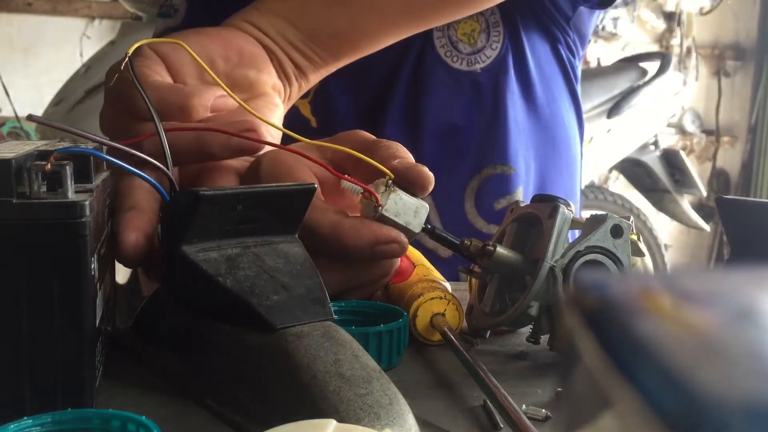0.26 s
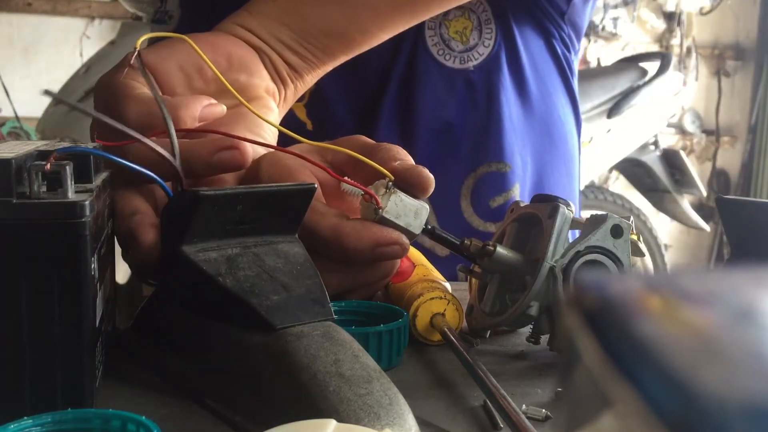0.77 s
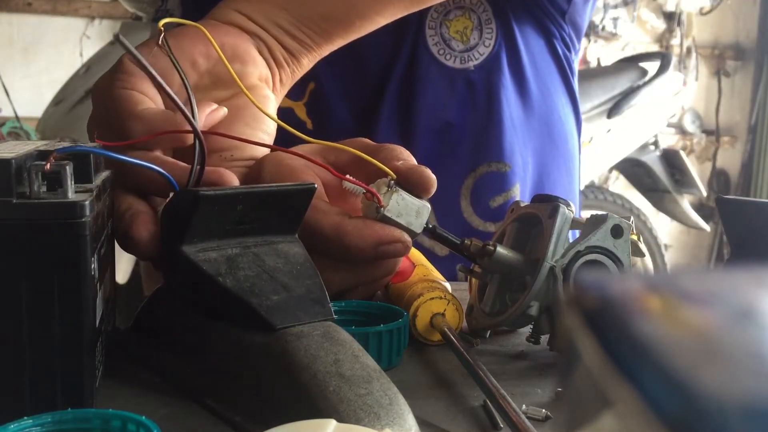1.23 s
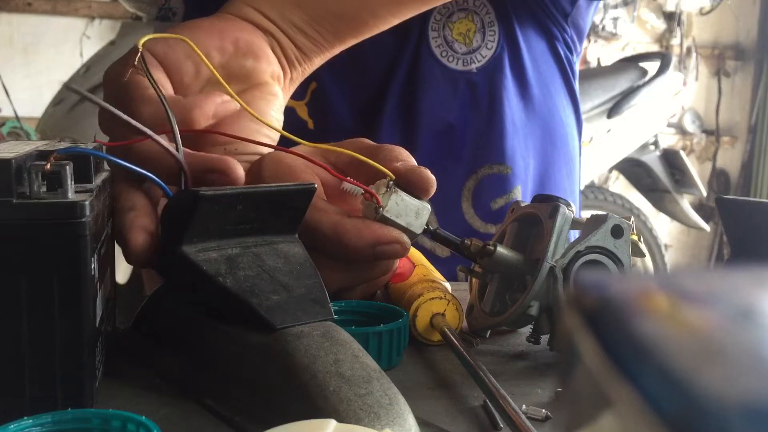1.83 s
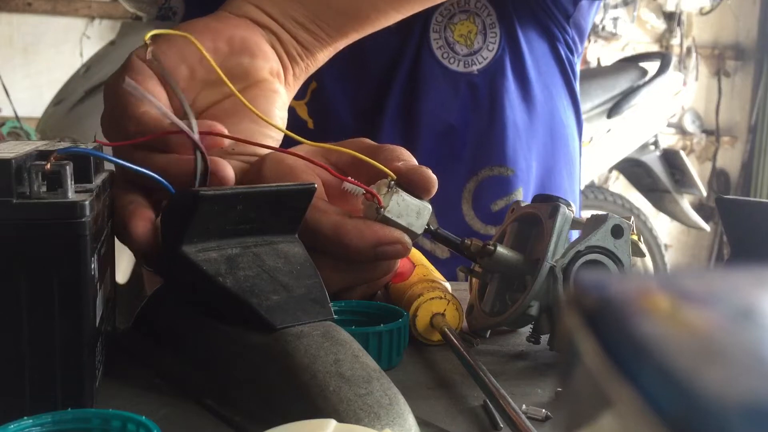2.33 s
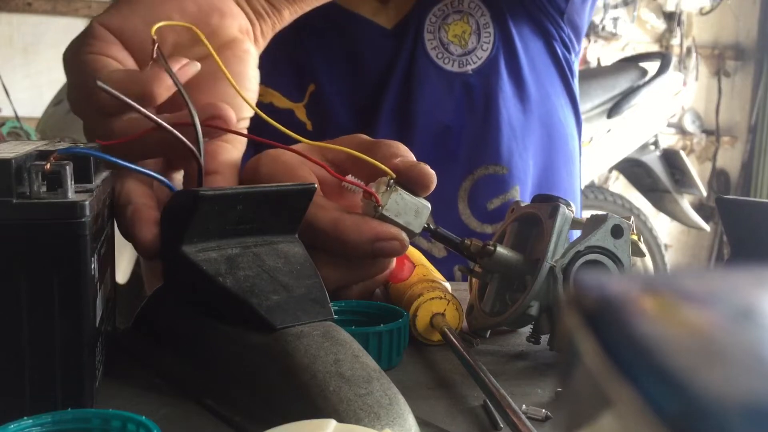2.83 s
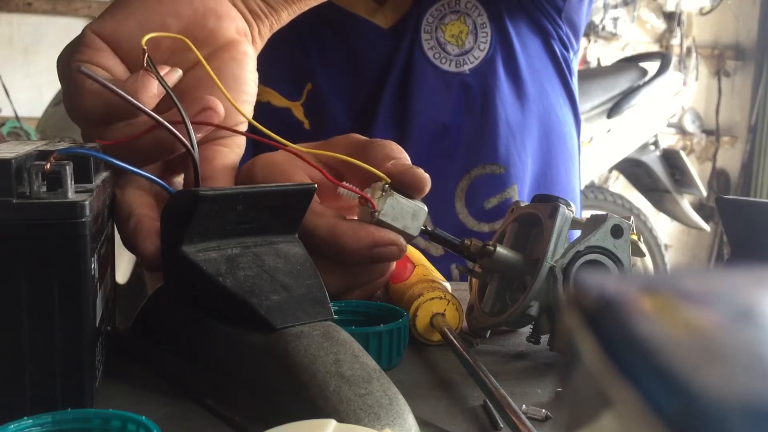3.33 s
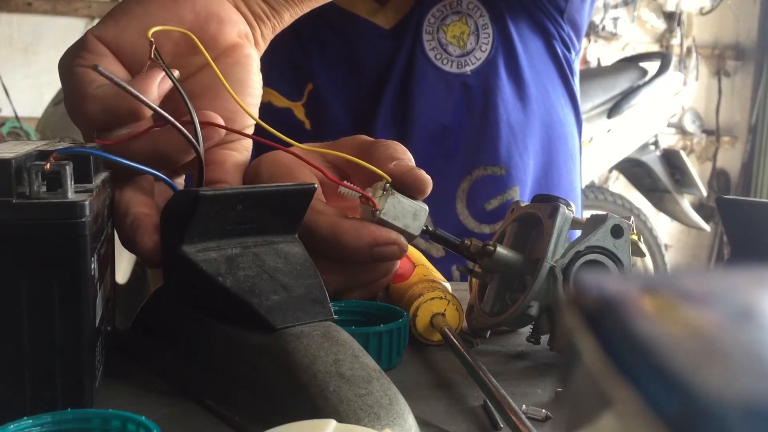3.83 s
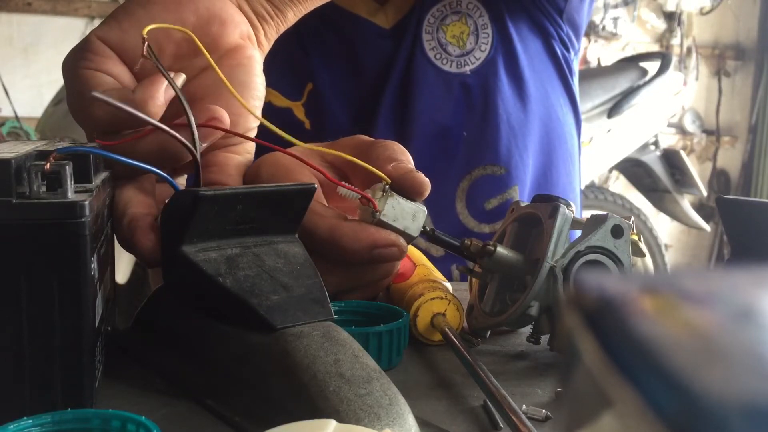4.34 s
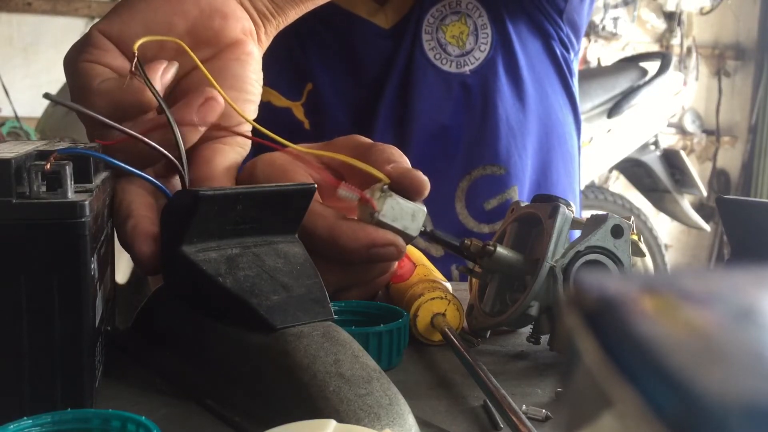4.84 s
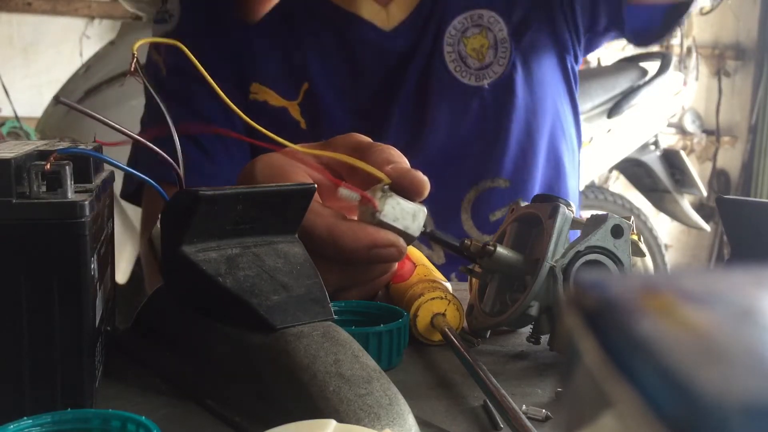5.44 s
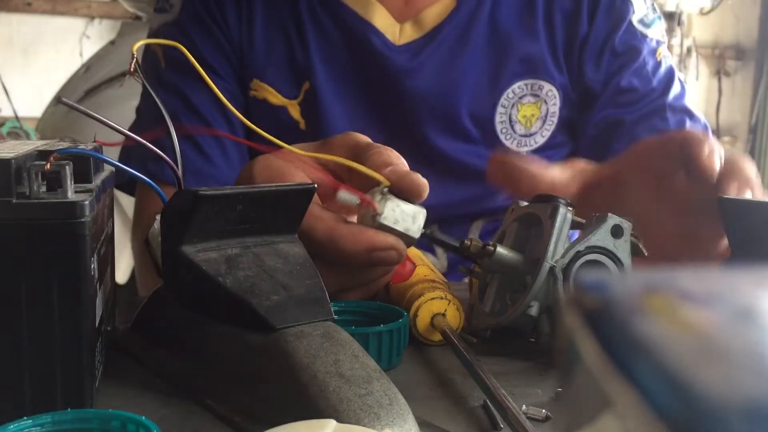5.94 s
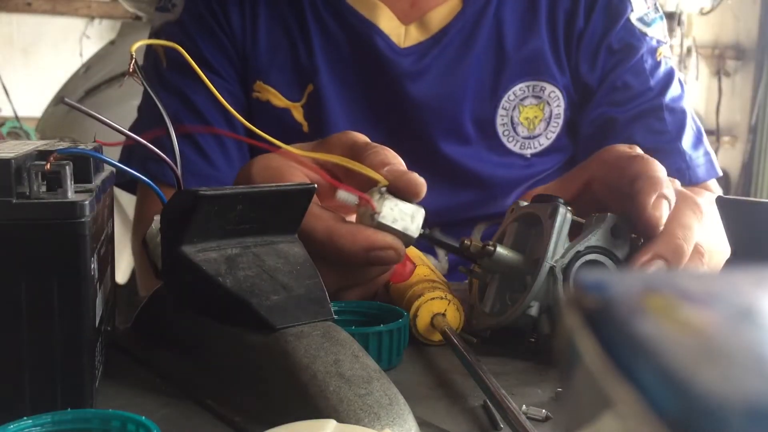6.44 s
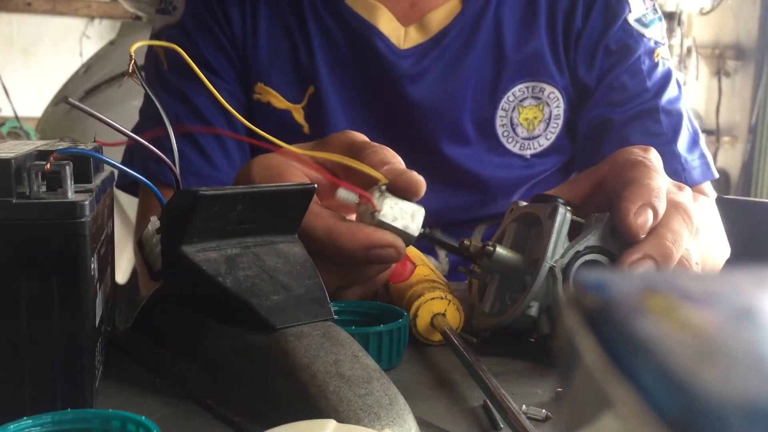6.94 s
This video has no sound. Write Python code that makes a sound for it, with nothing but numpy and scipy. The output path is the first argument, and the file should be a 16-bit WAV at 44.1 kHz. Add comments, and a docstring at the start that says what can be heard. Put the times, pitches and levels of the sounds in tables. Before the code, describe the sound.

A small motor hums deep and steady on a workbench, growing louder and creeping up in pitch over a low workshop rumble. Three crisp, dry ticks snap close to the microphone. A faint high whine climbs, hiss builds, and the mount sings briefly. In the last few seconds a loose part chatters in fast, gritty, metallic bursts while the hum continues.

```python
"""A small motor hums on a workbench and speeds up a little: sines at multiples of the turning rate.
Around it lie a rumbling workshop wash, a growing hiss and soft scuffs, all of shaped noise; a fuzzy
whistle makes the thin whine, and noise resonances make the mount sing. Three sharp ticks snap close by
as decaying rings with echoes. Late on, trains of knocks ring a loose part and it chatters."""
import sys
import numpy as np
from scipy import signal
from scipy.io import wavfile
from scipy.ndimage import uniform_filter1d

SR = 44100
rng = np.random.default_rng(int(sys.argv[2]) if len(sys.argv) > 2 else 0)


def put_to_file(sound):
    """Save the sound as 16-bit audio at rate SR, in the file named by the first command-line argument."""
    columns = np.atleast_2d(sound).T  # one column per channel
    safe = np.clip(columns, -1, 1)
    whole_steps = np.round(safe * 32767)
    wavfile.write(sys.argv[1], SR, whole_steps.astype(np.int16))


N = 316877
T = np.arange(N) / SR  # seconds

# The motor shaft. Each row: time in seconds, turns per second in Hz, first order in dB, second order in dB.
SHAFT = [(0, 51.5, -73, -53), (.4, 51.7, -36, -38), (.94, 52.91, -33, -35.5), (1.6, 53.49, -34.5, -38),
         (1.9, 55.27, -32, -57), (2.28, 55.83, -25.5, -57), (2.7, 55.8, -22.5, -42),
         (3.3, 56.3, -22, -37.5), (3.8, 57.48, -18, -35), (4.4, 57.3, -19.5, -32.5),
         (5.0, 57.38, -18.5, -27.5), (5.42, 58.77, -19.5, -33.5), (5.84, 57.86, -19, -30),
         (6.36, 60.5, -22.5, -27), (6.7, 59.8, -21.5, -31.5), (7.19, 60.04, -27, -35.5)]
LOOSE_S = 4.5  # the part works loose


def gain_of(db):
    """Decibels to gain."""
    return 10 ** (np.asarray(db) / 20)


def evened(x):
    """Scales to rms 1."""
    return x / np.sqrt(np.mean(x ** 2) + 1e-20)


def columns(rows):
    """Each column of a curve over time, sample by sample."""
    s, *values = np.transpose(rows)
    return [np.interp(T, s, v) for v in values]


def between(start, stop, fade):
    """A gate with straight fades, half open at start and at stop."""
    opening = np.clip((T - start) / fade + .5, 0, 1)
    closing = np.clip((stop - T) / fade + .5, 0, 1)
    return opening * closing


def drift(seconds, count=N):
    """Slow chance of rms 1: noise averaged twice over the given span."""
    size = max(int(seconds * SR), 2)
    once = uniform_filter1d(rng.standard_normal(count), size)
    return evened(uniform_filter1d(once, size))


def resonate(x, hz, width):
    """A resonance of gain about 1: one pair of poles, width in Hz."""
    r = np.exp(-np.pi * width / SR)
    c = r * np.cos(2 * np.pi * hz / SR)
    return signal.lfilter([2 * (1 - r), -2 * (1 - r) * c], [1, -2 * c, r * r], x)


def fuzzy(hz, width):
    """A steep band of noise, rms 1: two equal resonances in a row."""
    once = resonate(rng.standard_normal(N), hz, width)
    return evened(resonate(once, hz, width))


def noise(spectrum, patchy_db, streaky_db, size):
    """Random short-time spectra with drifting patches and narrow lasting streaks, rms 1."""
    hz = np.fft.rfftfreq(size, 1 / SR)
    f, db = np.transpose(spectrum)
    frames = N // (size // 4) + 5
    a, b, patches, streaks = rng.standard_normal((frames, len(hz), 4), dtype=np.float32).T
    # axis 0 is frequency, axis 1 is time
    patches = evened(uniform_filter1d(uniform_filter1d(patches, size=10, axis=0), size=16, axis=1))
    streaks = uniform_filter1d(streaks, size=2, axis=0)
    streaks = evened(uniform_filter1d(streaks, size=SR * 2 // size, axis=1))
    shape_db = np.interp(np.log(hz + 1), np.log(f + 1), db, left=-120, right=-120)[:, None]
    z = (a + 1j * b) * gain_of(shape_db + patchy_db * patches + streaky_db * streaks)
    return evened(signal.istft(z, nperseg=size, noverlap=size * 3 // 4)[1][:N])


def hum():
    """The turning shaft gives clean sines at its first three orders, and later a faint fifth."""
    # Level of the third order. Each row: time in seconds, level in dB.
    third_level = [(0, -40), (3.0, -39.5), (3.6, -35.5), (4.1, -36), (4.6, -42.5), (5.1, -33.5), (5.5, -43),
                   (6.0, -39.5), (6.8, -35), (7.19, -59)]
    lead, wander = 1.3, .25  # radians that each order leads the one below, and how far it wanders
    hz, *levels_db = columns(SHAFT)
    turns = np.cumsum(hz) / SR
    levels_db.append(columns(third_level)[0])
    out = gain_of(-51.5) * between(3.5, T[-1] + 1, .4) * np.cos(2 * np.pi * 5 * turns)
    for k, db in enumerate(levels_db):
        phase = k * (lead + wander * drift(0.28))
        out += gain_of(db) * np.cos(2 * np.pi * (k + 1) * turns + phase)
    return np.sqrt(2) * out  # the levels are rms


def wash():
    """The workshop's low rumble and mid body are shaped noise, with narrow wavering drones."""
    # Colour of the rumble. Each row: frequency in Hz, relative density in dB per Hz.
    rumble_colour = [(25, -47), (38, -17), (50, 5.5), (64, -0.5), (75, -9.5), (107, 0), (166, 1), (195, -6),
                     (250, -7.5), (307, -15), (370, -13.5), (420, -29), (520, -30)]
    # Colour of the mid body. Each row: frequency in Hz, relative density in dB per Hz.
    body_colour = [(300, -23), (370, -26), (410, -6), (470, -3.5), (600, -3), (750, -5), (1000, -4.5),
                   (1650, -5), (1900, -9), (2300, -9.5), (2750, -22), (3500, -23.5), (4500, -38)]
    # Level of the mid body. Each row: time in seconds, level in dB.
    body_level = [(0, -50), (.7, -45), (3.2, -43.5), (4.6, -41.5), (5.3, -39.5), (5.6, -41.5), (6.3, -42.5),
                  (7.19, -43.5)]
    # Drones that come and go. Each row: frequency in Hz, resonance width in Hz, level in dB,
    # start in seconds, end in seconds.
    drones = [(235, 9, -43, 0, 1.15), (157, 10, -38, .4, 5.6), (135, 7, -41, 1.4, 4.6),
              (98, 7, -42, 5.8, 7.3), (250, 7, -47, 4.0, 5.4), (210, 10, -45, 4.5, 7.3),
              (478, 30, -56, 4.3, 7.3), (1345, 45, -58, .8, 3.9), (995, 25, -54, 3.87, 4.36),
              (155, 8, -39, 6.4, 7.1), (1320, 50, -52, 5.3, 5.65)]
    rumble_db = -33.5 + .5 * T + 0.5 * drift(0.19)  # grows slowly and wavers
    rumble_db -= np.exp(-T / 0.15)  # a little quieter at first
    out = gain_of(rumble_db) * noise(rumble_colour, patchy_db=0.27, streaky_db=1.5, size=4096)
    out += gain_of(columns(body_level)[0]) * noise(body_colour, patchy_db=1.3, streaky_db=2.5, size=2048)
    for hz, width, db, start, stop in drones:
        out += gain_of(db) * between(start, stop, 0.12) * fuzzy(hz, width)
    return out


def hiss():
    """A dull and a bright noise flicker, with bands that they ring in the casing."""
    # Level of the dull hiss before the flicker. Each row: time in seconds, level in dB.
    dull_level = [(0, -68), (.9, -61.5), (2.5, -63), (3.3, -57.5), (3.85, -52), (4.05, -55.5), (4.5, -50),
                  (5.1, -47), (6.1, -54.5), (7.19, -56.5)]
    # Colour of the dull hiss. Each row: frequency in Hz, relative density in dB per Hz.
    dull_colour = [(2200, 2.5), (2800, -3), (3600, -6.5), (4100, -4), (5000, -7), (6300, -7.5),
                   (7200, -13.5), (9000, -13.5), (11000, -23), (15700, -47)]
    # Colour of the bright hiss. Each row: frequency in Hz, relative density in dB per Hz.
    bright_colour = [(3000, -26), (5000, -5.5), (7000, 0.5), (9500, 2), (10600, 0.5), (11700, 3),
                     (13000, -1), (14500, -0.5), (15650, 2), (15800, -43)]
    # Swells of the bright hiss. Each row: start in seconds, end in seconds, level at the start in dB,
    # sag in dB per second.
    swells = [(3.505, 3.98, -60.5, -1), (4.52, 5.899, -49.5, 2.5), (6.327, 7.093, -50.5, 8)]
    # Rings of the casing. Each row: frequency in Hz, resonance width in Hz, level in dB,
    # start in seconds, end in seconds.
    casing = [(4100, 400, -69, 0, 4.4), (8100, 800, -70, 1.9, 4.5), (8100, 700, -70, 2.5, 3.3),
              (6350, 300, -70, 3.1, 3.4), (11600, 900, -63, 4.5, 7.3), (14600, 600, -68, 4.5, 7.3)]
    floor_db, top_db, creep_s, creep_db_per_s = -79, -56, 1.96, 8
    # the bright hiss creeps up steadily, then holds its level
    bright = gain_of(np.clip(floor_db + creep_db_per_s * (T - creep_s), floor_db, top_db))
    for start, stop, db, sag_db in swells:
        swell = gain_of(db - sag_db * (T - start)) * between(start, stop, 0.33)
        bright = np.hypot(bright, swell)
    air = gain_of(columns(dull_level)[0]) * noise(dull_colour, patchy_db=.4, streaky_db=1.2, size=1024)
    air += bright * noise(bright_colour, patchy_db=2.2, streaky_db=3.0, size=1024)
    for hz, width, db, start, stop in casing:
        air += gain_of(db + 1.8 * drift(0.045)) * between(start, stop, 0.17) * fuzzy(hz, width)
    return air * gain_of(1.2 * drift(0.044))


def throb():
    """A gain that swells once per shaft turn until the part works loose."""
    depth = .18 * between(-1, LOOSE_S, .2)
    return 1 + depth * np.cos(2 * np.pi * np.cumsum(columns(SHAFT)[0]) / SR)


def scuffs():
    """Soft scuffs on the bench are short puffs of wide noise."""
    # Each row: start in seconds, level in dB, length in seconds, centre in Hz, resonance width in Hz.
    puffs = [(.24, -75, 0.051, 12500, 2500), (1.345, -56.5, 0.06, 3200, 3500),
             (1.88, -58, 0.031, 3200, 2800), (4.981, -47.5, 0.12, 3300, 2017)]
    out = np.zeros(N)
    for s, db, length, hz, width in puffs:
        out += gain_of(db) * between(s, s + length, length / 2) * fuzzy(hz, width)
    return out


def whine():
    """A fuzzy whistle with a finer core climbs evenly, then settles: slow noise shifted up to its pitch."""
    # Level before the flutter. Each row: time in seconds, level in dB.
    whine_level = [(.8, -75), (1.3, -64.5), (2.0, -77), (3.0, -74), (3.25, -67.5), (3.7, -59.5),
                   (3.95, -66), (4.15, -71), (4.45, -62), (4.7, -81)]
    start_hz, climb_hz_per_s, top_hz, bend_s = 6800, 1030, 9930, 0.55
    hz = uniform_filter1d(np.minimum(start_hz + climb_hz_per_s * T, top_hz), int(bend_s * SR))
    carrier = np.exp(2j * np.pi * np.cumsum(hz) / SR)
    wide, fine = (drift(s) + 1j * drift(s) for s in (.0015, .007))
    whistle = evened(((wide + 0.51 * fine) * carrier).real)
    level = gain_of(columns(whine_level)[0] + 1.8 * drift(0.023))
    return level * between(whine_level[0][0], whine_level[-1][0], 0.11) * whistle


def ticks():
    """A short crack rings the contact; echoes and a quick diffuse tail follow."""
    # Each row: time in seconds, then the strength in dB with which each ring of the contact is struck.
    snaps = [(1.547, -25, -18.5, -23, -3, -22, -9.5, -11, -32, -13, -11, -27, -12.5, -27, -19),
             (2.4803, -27, -16, -16, -11, -11.5, -11.5, -6.5, -11.5, -9, -23, -17, -13, -7.5, -7),
             (4.3598, -27, -19.5, -40, -9.5, -12, -10, -4, -17, -18, -13, -6.5, -9.5, -17, -13)]
    # Rings of the snapped contact. Each row: frequency in Hz, 60 dB decay time in seconds.
    contact = [(1450, 0.0086), (2300, 0.0055), (3050, 0.0072), (4240, 0.0087), (4680, 0.013),
               (5800, 0.0072), (6590, 0.0053), (8300, 0.0087), (9000, 0.0048), (10000, 0.0077),
               (10850, 0.0078), (11350, 0.0085), (12200, 0.0067), (14100, 0.0041)]
    # Nearby surfaces return each snap. Each row: delay in seconds, level in dB.
    returns = [(.0058, -19), (.0105, -24)]
    out, t = np.zeros(N), np.arange(round(.15 * SR)) / SR
    rise = 1 - np.exp(-(t / 0.00042) ** 2)
    rise = gain_of(-2.0) * rise * (1 + 1.1 * np.exp(-t / .0009))  # the first instant is stronger
    # a quick and a slow decay, by 60 dB in 0.036 s and 0.19 s
    tail = gain_of(-22.5 - 60 * t / 0.036) + gain_of(-39.0 - 60 * t / 0.19)
    tail *= 1 - np.exp(-t / 0.0005)
    for s, *strengths_db in snaps:
        sound = np.zeros(len(t))
        for db, (hz, t60) in zip(strengths_db, contact):
            # each ring starts at a chance phase within half a cycle
            phase = 2 * np.pi * (hz * (t - .0004) + .5 * rng.random())
            ring = rise * gain_of(-60 * t / t60) * np.sin(phase)
            diffuse = evened(resonate(rng.standard_normal(len(t)), hz, 660))
            sound += gain_of(db) * (ring + tail * diffuse)
        # a faint touch 1 ms early, the snap itself, then its echoes
        for delay, db in [(-0.001, -21), (0, 0), *returns]:
            stretch = out[round((s + delay) * SR):][:len(t)]
            stretch += gain_of(db) * sound
    return out


def mount():
    """The motor strains and its mount sings: the same fuzzy resonances each time."""
    # Strains. Each row: start in seconds, end in seconds, level in dB, pitch factor.
    strains = [(3.306, 4.004, -51.5, 1.0), (4.85, 5.41, -51, 1.03)]
    # What sings. Each row: frequency in Hz before the pitch factor, resonance width in Hz, relative level in dB.
    resonances = [(972, 27, -2.5), (1307, 51, -6), (1669, 99, 2.5), (6260, 280, -10.5), (7800, 410, -9),
                  (8300, 310, -10)]
    out = np.zeros(N)
    for start, stop, db, factor in strains:
        for hz, width, ring_db in resonances:
            level = gain_of(db + ring_db + 1.44 * drift(0.021))
            out += level * between(start, stop, 0.27) * fuzzy(hz * factor, width)
    return out


def chatter(air):
    """Regular gritty knocks ring a loose part, each ring fickle by itself, and the hiss beats along."""
    # Bouts of louder chatter, most of them faster. Each row: start in seconds, end in seconds,
    # knocks per second in Hz, rebound from 0 to 1, then low, middle and high rings in dB.
    bout_rows = [(4.5, 4.623, 77.7, 0.4, -48.5, -54, -61), (4.698, 5.104, 78.2, 0.6, -64, -54, -68),
                 (5.182, 5.375, 82, 0.3, -53.5, -53, -57), (5.425, 5.713, 83.6, 0.06, -51, -56, -57),
                 (5.74, 5.952, 80.2, 0.6, -59, -66, -59), (6.178, 6.267, 81.98, 0.79, -58, -70, -61),
                 (6.302, 6.463, 89.7, .4, -62, -53, -54.5), (6.459, 6.66, 89.2, 0.9, -50.5, -53, -54),
                 (6.681, 6.924, 89.4, 0.45, -50, -57, -58), (6.924, 7.117, 90, .4, -52.5, -59.5, -58)]
    # Three groups of rings: low, middle, high. Each row: frequency in Hz, width of the first of
    # two resonances in Hz, relative level in dB.
    ring_groups = [
        [(4410, 110, 0), (4580, 120, -7), (4230, 200, -17)],
        [(5200, 400, -6), (5900, 250, -4), (6560, 150, -1), (7200, 170, -6), (7840, 140, -3), (8720, 120, 0),
         (9320, 140, -3), (9790, 110, -6)],
        [(10900, 250, -5), (11700, 300, 0), (13300, 160, -7), (14500, 200, -3), (15300, 200, -2)],
    ]
    # One ring changes level for a while. Each row: start in seconds, end in seconds, ring in Hz, change in dB.
    flares = [(4.5, 4.64, 4230, 14), (4.5, 5.72, 4580, 6), (5.61, 5.69, 6560, 6), (6.7, 6.75, 6560, 8),
              (6.76, 6.95, 4580, 5), (6.75, 6.9, 4410, 2), (6.64, 6.75, 4410, -2), (6.5, 6.62, 7200, 5),
              (5.1, 5.2, 9320, 6), (5.27, 5.37, 6560, 6), (5.2, 5.42, 14500, 4), (5.62, 5.72, 11700, 5),
              (5.44, 5.55, 7200, 8), (5.45, 5.56, 7840, 6), (5.47, 5.54, 9320, 9), (6.36, 6.62, 5200, 5),
              (6.31, 6.46, 7840, 6), (6.43, 6.49, 6560, 7), (6.33, 6.46, 11700, 5), (6.37, 6.53, 14500, 5),
              (6.5, 6.64, 5900, 6), (6.54, 7.02, 8720, 6), (6.76, 7.0, 10900, 5)]
    loose_hz, loose_db = 77.7, (-61.5, -63.5, -59.5)  # between bouts: knocks per s; low, middle, high rings
    fade_s = 0.046
    first = round(LOOSE_S * SR)
    gates = np.array([between(start, stop, fade_s)[first:] for start, stop, *_ in bout_rows])
    bouts = np.array(bout_rows)
    hz = loose_hz + (bouts[:, 2] - loose_hz) @ gates
    count = len(hz)
    levels = np.sqrt(gain_of(loose_db)[:, None] ** 2 + gain_of(bouts[:, 4:].T) ** 2 @ gates)

    uneven_hz = hz * (1 + .006 * drift(.02, count=count))
    knocks = np.diff(np.floor(np.cumsum(uneven_hz) / SR), prepend=0)
    knocks *= gain_of(1.0 * rng.standard_normal(count))
    # the part swings back 24 cycles of its first low ring later, in step with it
    rebound = np.roll(knocks, round(24 / ring_groups[0][0][0] * SR))
    swing = np.clip(bouts[:, 3] @ gates, 0, 1)

    # a brief scrape follows each blow
    n = np.arange(400)
    scrape = n / (0.00083 * SR) * np.exp(-n / (0.0023 * SR))
    beat = abs(signal.oaconvolve(knocks, scrape)[:count])
    share = .4 * np.clip(gates.sum(axis=0), 0, 1)  # of the hiss power that beats during a bout
    out = air.copy()
    out[first:] *= np.sqrt(1 - share + share * beat / beat.mean())

    by_group = zip(ring_groups, levels, (1, .3, .3), (.035, .04, .1), (.6, 1.6, 1.8))
    for rings, level, back, grit, fickle_db in by_group:
        blows = knocks + back * swing * rebound
        scrapes = signal.oaconvolve(blows, scrape)[:count]
        blows = blows + grit * scrapes * rng.standard_normal(count)
        group = np.zeros(count)
        for f, width, ring_db in rings:
            db = ring_db + fickle_db * drift(.1, count=count)
            for start, stop, flare_hz, flare_db in flares:
                if flare_hz == f:
                    db += flare_db * between(start, stop, fade_s)[first:]
            ringing = resonate(resonate(blows, f, width), f, 3 * width)
            group += gain_of(db) * evened(ringing)
        out[first:] += level * evened(group)
    return out


def scene():
    """All sources at one microphone; mount, whine and hiss throb with the shaft."""
    steady = hum() + wash()
    air = chatter(throb() * hiss())
    singing = throb() * (mount() + whine())
    return (steady + air + singing + ticks() + scuffs())[None]


def record(dry):
    """The microphone drops the deepest bass; full scale clips; then the band limit at 15.9 kHz."""
    heard = signal.sosfilt(signal.butter(2, 46, "high", fs=SR, output="sos"), dry)
    band_limit = signal.firwin(255, 15900, window=("kaiser", 9), fs=SR)[None]
    return signal.oaconvolve(np.clip(heard, -1, 1), band_limit, "same")


dry = scene()
out = record(dry)
put_to_file(out)
```